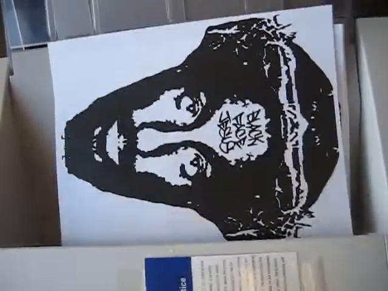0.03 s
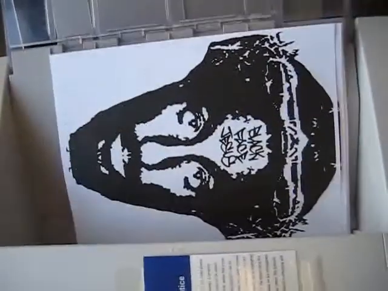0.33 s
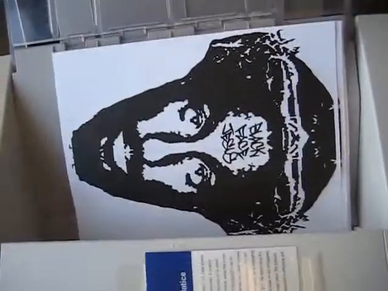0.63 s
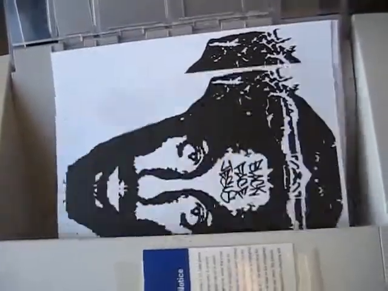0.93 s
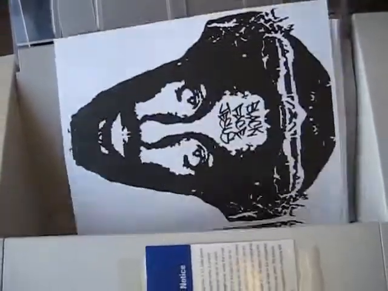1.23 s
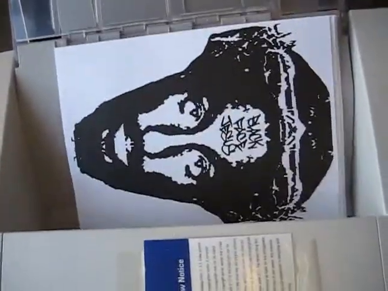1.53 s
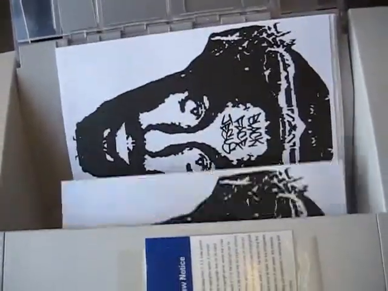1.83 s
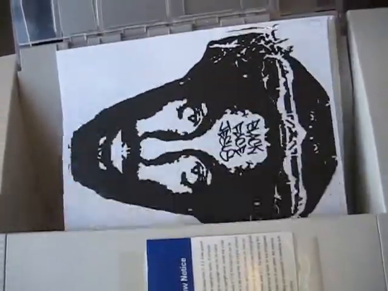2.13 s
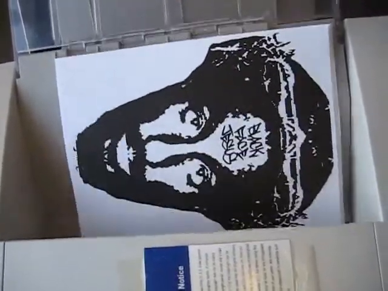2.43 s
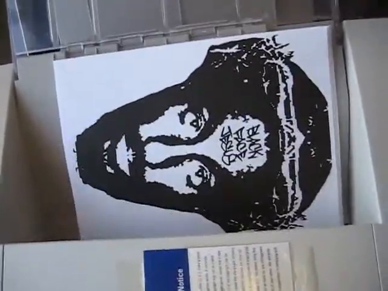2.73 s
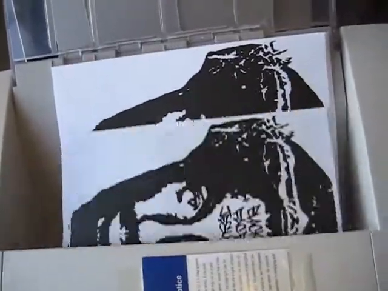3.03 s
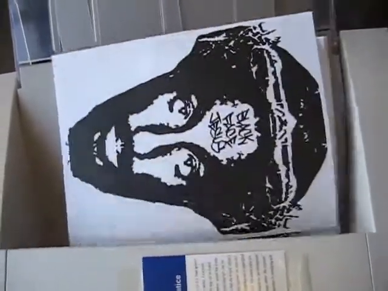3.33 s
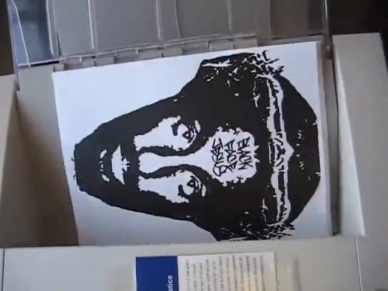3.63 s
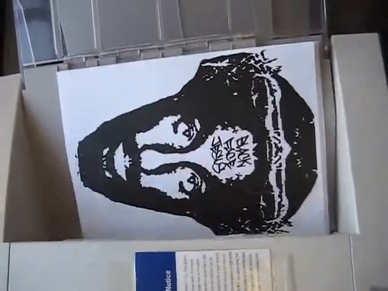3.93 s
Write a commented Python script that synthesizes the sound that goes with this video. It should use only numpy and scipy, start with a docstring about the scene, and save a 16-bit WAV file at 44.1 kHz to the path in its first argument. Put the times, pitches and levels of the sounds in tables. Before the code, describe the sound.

A printer runs steadily, clacking and rustling as it feeds sheets into a tray.

```python
"""A laser printer in a small room, one microphone close above its top tray.
Motor, fan and gears run from the start and never stop. A sheet is already on its way out: it rustles,
flops on the pile and its edge flicks free, while something knocks inside the casing. At 0.6 s a clutch
clacks in and the rollers drag the next sheet along, now and then squeaking; 0.3 s later a latch snaps
shut. That sheet rustles out in turn, and a new page starts about every 1.08 s."""
import sys
import numpy as np
from scipy import signal
from scipy.fft import rfft, irfft, next_fast_len
from scipy.io import wavfile

SR = 44100
rng = np.random.default_rng(int(sys.argv[2]) if len(sys.argv) > 2 else 0)


def transcribe(signal):
    """Save signal, clipped to [-1, 1], as a 16-bit WAV file at the path in sys.argv[1]."""
    frames = np.atleast_2d(signal).T
    limited = np.clip(frames, -1, 1)
    pcm = np.round(limited * 32767).astype(np.int16)
    wavfile.write(sys.argv[1], SR, pcm)


N = 176400
T = np.arange(N) / SR


def from_db(db):
    """Decibels to gain."""
    return 10 ** (np.asarray(db) / 20)


def rms_one(x):
    """Scale to unit rms."""
    return x / np.sqrt(np.mean(x ** 2) + 1e-20)


def drift(rate_hz):
    """A smooth random wander of rms 1, mostly slower than rate_hz."""
    step, settle = 40, 2000
    pole = np.exp(-2 * np.pi * rate_hz * step / SR)
    noise = rng.standard_normal(N // step + settle + 2)
    slow = signal.lfilter([1], [1, -2 * pole, pole * pole], noise)[settle:]
    return np.interp(np.arange(N) / step, np.arange(len(slow)), rms_one(slow))


def colour(x, points):
    """Causal filter of unit power gain following (f/Hz, level/dB), falling 20 dB an octave outside."""
    size = next_fast_len(N + SR // 2)
    hz, db = np.transpose(points)
    f = np.maximum(np.fft.rfftfreq(size, 1 / SR), 1)
    octaves_outside = np.maximum(np.log2(f / hz[-1]), 0) + np.maximum(np.log2(hz[0] / f), 0)
    gain = rms_one(from_db(np.interp(np.log(f), np.log(hz), db) - 20 * octaves_outside))
    # minimum phase: nothing sounds ahead of a hit
    cepstrum = irfft(np.log(gain), size)
    cepstrum[1:size // 2] *= 2
    cepstrum[size // 2 + 1:] = 0
    return irfft(rfft(x, size) * np.exp(rfft(cepstrum)), size)[:N]


def resonance(x, hz, width_hz):
    """One resonance with gain 1 at its peak."""
    r = np.exp(-np.pi * width_hz / SR)
    gain = (1 - r * r) / 2
    return signal.lfilter([gain, 0, -gain], [1, -2 * r * np.cos(2 * np.pi * hz / SR), r * r], x + 1e-18)


def body(x, modes, sign=-1):
    """Parallel modes (f/Hz, width/Hz, level/dB) of about unit power gain, mode k weighted by sign**k."""
    power = sum(from_db(db) ** 2 * np.pi * width / SR for _, width, db in modes)
    ring = sum(sign ** k * from_db(db) * resonance(x, hz, width)
               for k, (hz, width, db) in enumerate(modes))
    return ring / np.sqrt(power)


def hiss():
    """White noise of even strength."""
    return rng.choice([-1., 1.], N)


def grains(per_s, spread_db):
    """Random clicks of uneven size, rms 1."""
    sizes = from_db(spread_db * np.minimum(rng.exponential(1, N), 4)) * rng.choice([-1, 1], N)
    return rms_one(sizes * (rng.random(N) < per_s / SR))


def taps(rows):
    """Single contacts (t/s, level/dB); the level is that over one millisecond."""
    out = np.zeros(N)
    for s, db in rows:
        out[int(s * SR)] += from_db(db) * np.sqrt(SR / 1000)
    return out


def burst(s, db, rise, t60):
    """Envelope starting at s with a straight rise and an exponential fall; times in seconds."""
    age = T - s
    fall_db = np.clip(60 * (age - rise) / t60, 0, 200)
    return from_db(db - fall_db) * np.clip(age / rise, 0, 1)


def tones(lines, waver_db, wander):
    """Sines that waver in level and share the motor's small changes of speed."""
    motor_time = np.cumsum(1 + wander * drift(3.56)) / SR
    return sum(np.sqrt(2) * from_db(db + waver_db * drift(4))
               * np.sin(2 * np.pi * (hz * motor_time + rng.random())) for hz, db in lines)


def glides(rows, rise, t60, jitter_hz, rough_db, rate_hz):
    """Short sliding tones, unsteady in pitch and strength."""
    jitter, out = jitter_hz * drift(rate_hz), 0
    for s, hz, hz_per_s, db in rows:
        pitch = hz + hz_per_s * np.clip(T - s, 0, t60 / 2) + jitter
        phase = 2 * np.pi * (np.cumsum(pitch) / SR + rng.random())
        out = out + burst(s, db, rise, t60) * np.sin(phase)
    return np.sqrt(2) * out * from_db(rough_db * drift(rate_hz))


# motor hum and gear whine: f/Hz, rms level/dB
MOTOR_HUM = [(43.1, -36.5), (120, -31.5), (171.8, -41)]
GEAR_WHINE = [(700, -52.5), (877, -46), (1034, -48), (1158, -51.5), (1226, -50), (1751, -55.5), (5846, -65)]
# rush of the fan and gear train: f/Hz, relative level/dB
RUSH_COLOUR = [(12, -30.5), (20, -4.5), (53, -4), (91, -9), (289, -15), (450, -18), (1200, -22.5),
               (1650, -25.5), (5090, -35.5), (7000, -53), (9100, -98)]

def drive():
    """The steady bed: fan rush, the fine ticking of the gear train, motor hum and gear whine."""
    rush = from_db(-27.5 + 1.06 * drift(33)) * hiss()
    ticks = from_db(-41.5) * colour(grains(per_s=450, spread_db=0.8), RUSTLE_COLOUR)
    hum = tones(MOTOR_HUM, waver_db=1.3, wander=0.0019)
    whine = tones(GEAR_WHINE, waver_db=3, wander=0.00206)
    return colour(rush, RUSH_COLOUR) + ticks + hum + whine


# strength of the drag on one sheet: t/s from its pick-up, level/dB
DRAG_ENVELOPE = [(-.03, -48), (0.011, -37.5), (0.07, -30.5), (0.121, -30), (0.269, -28.5), (.37, -35.5),
                 (0.464, -44), (0.552, -34)]
# its scrape: f/Hz, relative level/dB
DRAG_COLOUR = [(100, -16.5), (200, 1), (450, -5), (1100, -3.5), (1600, -5.5), (2300, -7.5), (3500, -11.5),
               (5200, -17), (7000, -33)]

def rollers(first_pick_s=0.6, page_s=1.0834):
    """Once a page, the dragged sheet scrapes along and rattles loose parts."""
    after_s, db = np.transpose(DRAG_ENVELOPE)
    level = sum(from_db(np.interp(T - first_pick_s - page * page_s, after_s, db, -120, -120))
                for page in range(-1, 4))  # page -1 is the sheet already on its way
    scrape = colour(grains(per_s=1400, spread_db=2), DRAG_COLOUR)
    return level * (scrape + from_db(-4.5) * rattle())


def rattle(parts=14, low_hz=447, high_hz=1205):
    """Random contacts, each ringing one loose part at its own pitch; rms 1."""
    contacts = grains(per_s=180, spread_db=2)
    struck = rng.integers(0, parts, N)
    pitches = np.geomspace(low_hz, high_hz, parts)
    return rms_one(sum(resonance(contacts * (struck == k), hz, width_hz=50)
                       for k, hz in enumerate(pitches)))


# paper rubbing and slapping in the tray, just below the microphone: t/s, level/dB, t60/s
RUSTLES = [(0, -26.5, 0.088), (0.251, -24, 0.15), (0.367, -26, 0.07), (0.597, -30.5, 0.11),
           (0.791, -20, 0.077), (1.09, -29.5, 0.054), (1.339, -24.5, 0.095), (1.359, -23.5, 0.048),
           (1.459, -31, 0.072), (2.011, -27, 0.06), (2.181, -29.5, 0.14), (2.422, -25.5, 0.14),
           (2.521, -29.5, 0.18), (2.963, -25, 0.063), (3.264, -29.5, 0.067), (3.454, -22, 0.08),
           (3.519, -27, 0.21)]
# the rustle's spectrum, shared by the gear ticks: f/Hz, relative level/dB
RUSTLE_COLOUR = [(300, -9), (1000, -5.5), (2000, 7), (3300, 2), (5500, -4), (7000, -21)]
# resonances of the tray: f/Hz, width/Hz, relative level/dB
TRAY_MODES = [(2880, 360, -3.5), (3600, 140, 2.5), (4580, 710, -5.5)]

def paper():
    """The sheet rustles in fine grains and its rubbing rings the tray."""
    rubbing = sum(burst(s, db, rise=0.003, t60=t60) for s, db, t60 in RUSTLES)
    rustle = colour(grains(per_s=3000, spread_db=2) * rubbing, RUSTLE_COLOUR)
    return rustle + from_db(-4) * body(hiss() * rubbing, TRAY_MODES)


# loose knocks of the mechanism: t/s, level/dB, t60/s
KNOCKS = [(0.184, -20.5, 0.3), (1.869, -23, 0.094), (3.456, -22, 0.24)]
# their spectrum: f/Hz, relative level/dB
KNOCK_COLOUR = [(100, 1.5), (1000, -2), (2200, -12), (4000, -12.5), (7000, -28)]

def knocks():
    """The loose mechanism knocks dully inside the casing."""
    level = sum(burst(s, db, rise=0.0034, t60=t60) for s, db, t60 in KNOCKS)
    return colour(hiss() * level, KNOCK_COLOUR)


# the sheet flopping on the pile: t/s, f/Hz, glide/(Hz/s), level/dB
FLOPS = [(0.186, 235, 295, -30), (0.305, 215, -300, -33), (0.368, 165, 701, -27), (1.485, 215, 298, -30.5),
         (1.855, 290, -500, -32), (2.07, 225, -700, -29.5), (2.945, 190, 698, -30.5),
         (3.228, 310, -1200, -29.5), (3.299, 200, -1200, -28.5)]
# its flutter: f/Hz, relative level/dB
FLOP_COLOUR = [(60, -20.5), (140, -3), (215, 3), (520, -10.5), (1500, -36)]

def flops(t60=0.33):
    """Soft thumps: a dull flutter, and a low tone that slides as the sheet bends."""
    level = sum(burst(s, db - 1, rise=0.025, t60=t60) for s, _, _, db in FLOPS)
    flutter = colour(hiss() * level, FLOP_COLOUR)
    return flutter + glides(FLOPS, rise=0.014, t60=t60, jitter_hz=12, rough_db=2, rate_hz=47.6)


# the sheet's edge flicking free: t/s, snap level/dB, pop level/dB, ring f/Hz, ring level/dB
FLICKS = [(0.2895, -21.5, -30, 3900, -17), (1.3630, -25.5, -28, 3000, -19), (1.378, -22, -34, 3500, -24),
          (1.389, -20.5, -26, 4150, -19.5), (2.4834, -19, -24, 3670, -22),
          (3.1325, -24, -12.5, 3600, -16.5), (3.627, -24, -36, 3600, -30)]
# its snap and buzz: f/Hz, relative level/dB
FLICK_COLOUR = [(500, -19.5), (2700, 1), (4200, 4), (5300, -11.5), (7000, -18.5)]
# the plastic lip that it strikes: multiple of the ring frequency, width/Hz, relative level/dB
LIP_MODES = [(1.0, 230, -1), (1.13, 300, -1.5), (1.24, 318, -3)]

def flicks(pop_hz=895, pop_width_hz=190):
    """The edge snaps free, buzzes for an instant, pops the sheet and rings the plastic lip."""
    snap = taps([(s, db) for s, db, *_ in FLICKS])
    buzz = hiss() * sum(burst(s, db - 1.5, rise=0.0011, t60=0.022) for s, db, *_ in FLICKS)
    pop = body(taps([(s, db) for s, _, db, *_ in FLICKS]), [(pop_hz, pop_width_hz, 0)])
    rings = 0
    for s, _, _, hz, ring_db in FLICKS:
        modes = [(hz * ratio, width, db) for ratio, width, db in LIP_MODES]
        rings = rings + body(taps([(s, ring_db)]), modes)
    return colour(snap + buzz, FLICK_COLOUR) + pop + rings


# the pick-up clutch engaging: t/s, level/dB
CLUTCH_CLACKS = [(0.594, -23.5), (1.68, -23.5), (2.765, -20.5), (3.864, -24.5)]
# its spectrum: f/Hz, relative level/dB
CLUTCH_COLOUR = [(150, -15.5), (500, -3), (900, 0.5), (3000, -1.5), (7000, -21)]

def clutch():
    """A short clatter of plastic teeth starts each page."""
    level = sum(burst(s, db, rise=0.0022, t60=0.16) for s, db in CLUTCH_CLACKS)
    return colour(hiss() * level, CLUTCH_COLOUR)


# squeaks of the dragged sheet: t/s, f/Hz, glide/(Hz/s), level/dB
SQUEAKS = [(0.703, 1075, -300, -29), (1.876, 477.5, 800, -26.5), (1.932, 892, 4199, -30),
           (2.892, 1110, -700, -34), (2.958, 832, -300, -29), (3.02, 1030, 800, -31)]

def squeaks():
    """Now and then the drag turns briefly into a rough tone."""
    return glides(SQUEAKS, rise=0.017, t60=0.14, jitter_hz=21.7, rough_db=4, rate_hz=90)


# latch snaps and one bounce: t/s, crack level/dB, ring level/dB, chatter level/dB, pitch ratio
LATCH_SNAPS = [(0.8958, -21, -12.5, -21, 1.035), (1.9836, -19.5, -12.5, -24, 0.975),
               (1.9880, -30, -18, -35, 1.07), (3.0688, -20, -23.5, -17, 0.9)]
# the latch's ring: f/Hz at pitch ratio 1, relative level/dB, t60/s
LATCH_MODES = [(1490, -13, .03), (1955, -8.5, 0.017), (2213, 6.5, 0.045), (2930, -10.5, .018),
               (3540, -6.5, 0.031), (4370, -8.5, 0.011)]
# its crack and chatter: f/Hz, relative level/dB
LATCH_COLOUR = [(200, -13), (900, -5.5), (2600, 3.5), (5000, -3.5), (7000, -18)]

def latch():
    """The latch shuts with a hard crack, a short chatter and a ring that varies from snap to snap."""
    crack = taps([(s, db) for s, db, *_ in LATCH_SNAPS])
    chatter = hiss() * sum(burst(s, db, rise=0.0025, t60=0.033) for s, _, _, db, _ in LATCH_SNAPS)
    rings = 0
    for s, _, ring_db, _, pitch in LATCH_SNAPS:
        modes = [(pitch * hz, np.log(1000) / (np.pi * t60), db) for hz, db, t60 in LATCH_MODES]
        rings = rings + body(taps([(s, ring_db)]), modes, sign=0.98)
    return colour(crack + chatter, LATCH_COLOUR) + rings


def room(x, t60=0.14):
    """The small room's diffuse tail, reaching the microphone 3 ms behind the direct sound."""
    age = T[:SR // 2]
    tail = rng.standard_normal(len(age)) * from_db(-60 * age / t60) * (age > .003)
    return signal.fftconvolve(x, tail / np.sqrt(np.sum(tail ** 2)))[:N]


def scene():
    """Mono, from close above: the drive and the flicks dry, the page cycle with a little room."""
    cycle = rollers() + squeaks() + clutch() + latch() + knocks() + paper() + flops()
    return (drive() + cycle + flicks() + from_db(-12.5) * room(cycle))[None]


def record(dry):
    """A narrow-band recorder: the treble rounds off above 6.2 kHz and is 60 dB down by 7.6 kHz."""
    soft = signal.sosfilt(signal.butter(6, 6200, fs=SR, output="sos"), dry)
    return signal.sosfilt(signal.cheby2(14, 60, 7600, fs=SR, output="sos"), soft)


dry = scene()
out = record(dry)
transcribe(out)
```